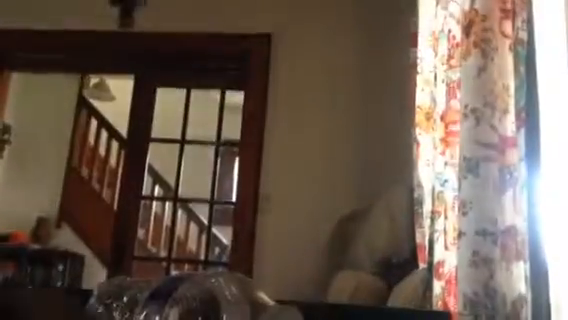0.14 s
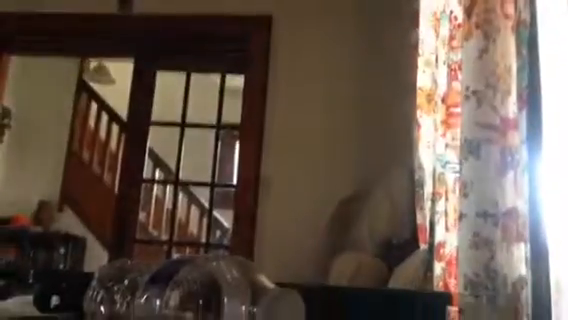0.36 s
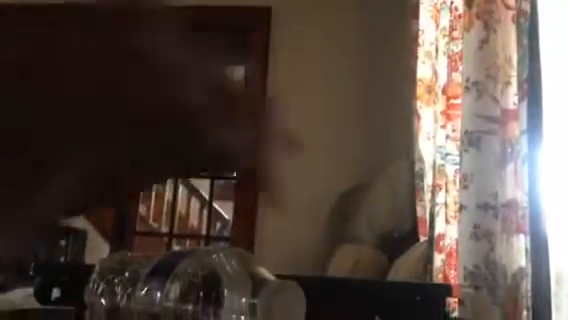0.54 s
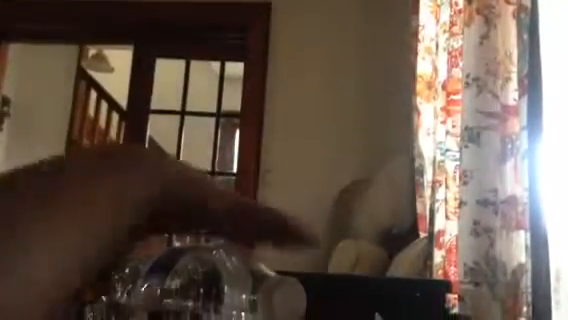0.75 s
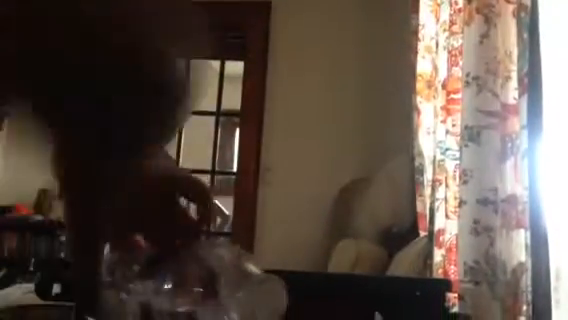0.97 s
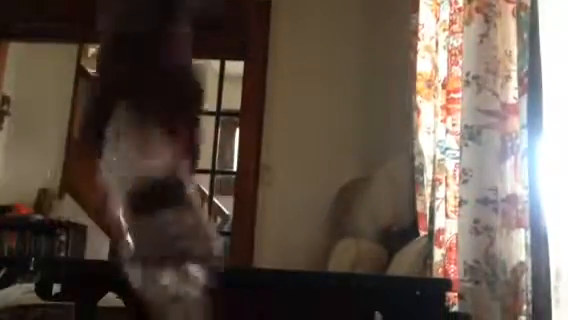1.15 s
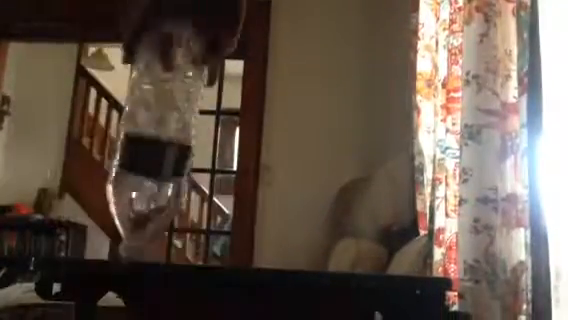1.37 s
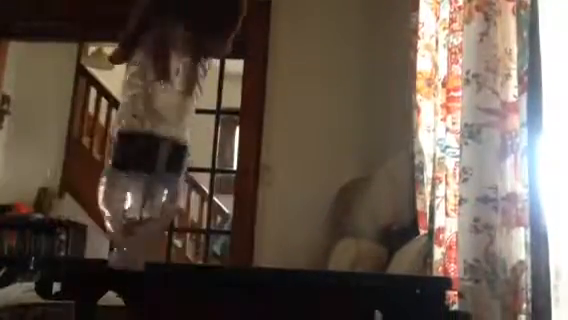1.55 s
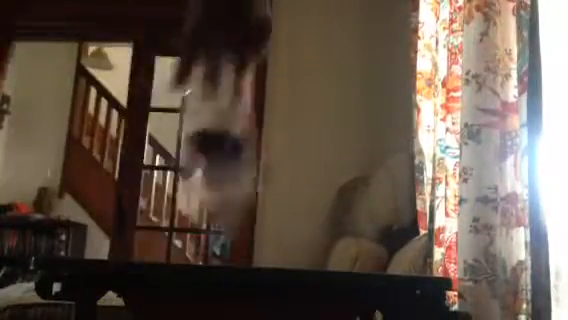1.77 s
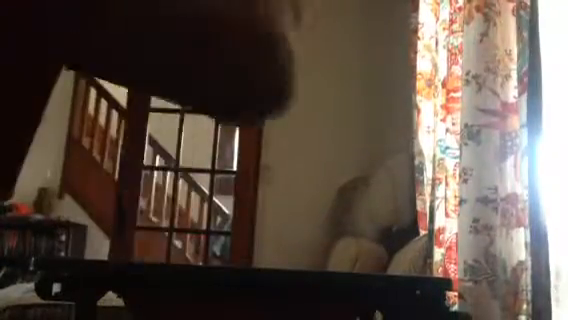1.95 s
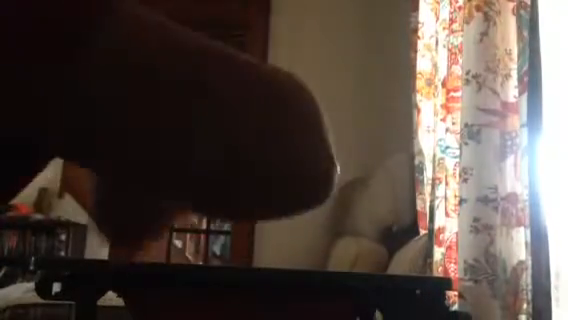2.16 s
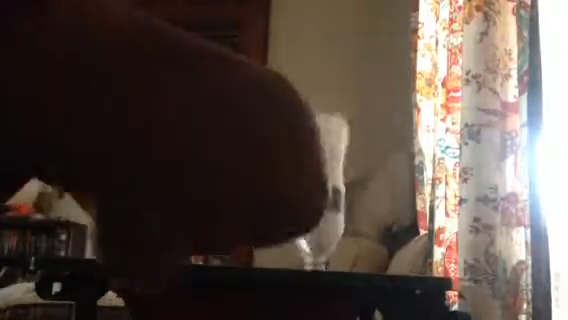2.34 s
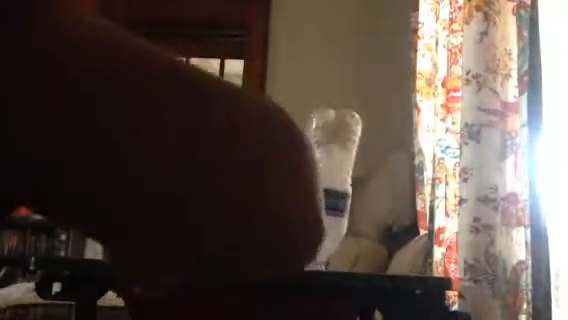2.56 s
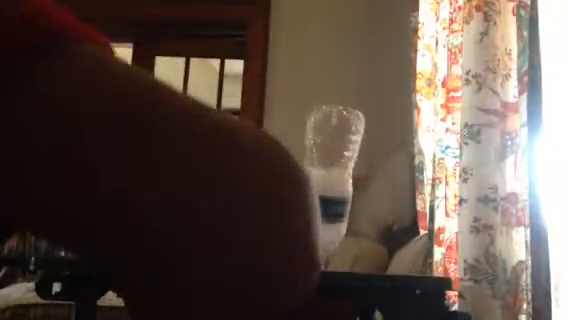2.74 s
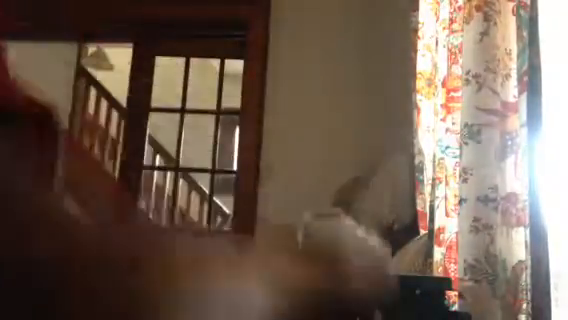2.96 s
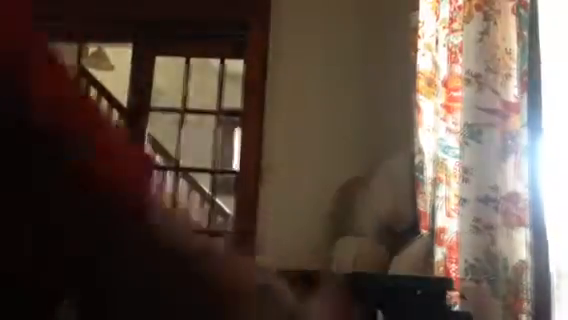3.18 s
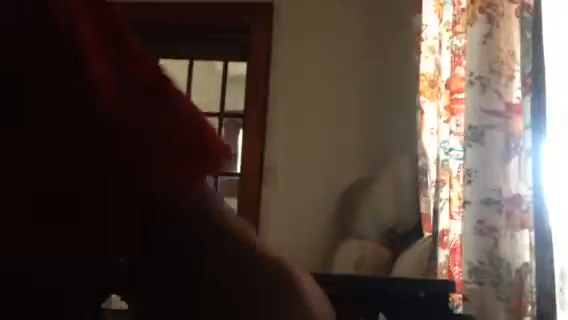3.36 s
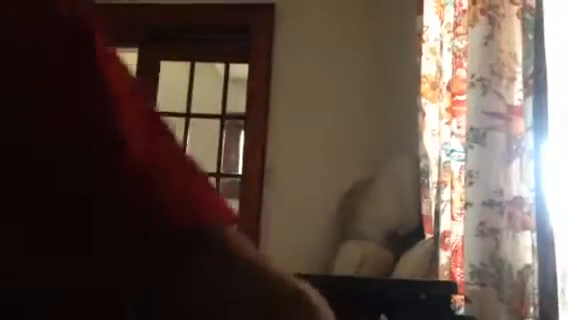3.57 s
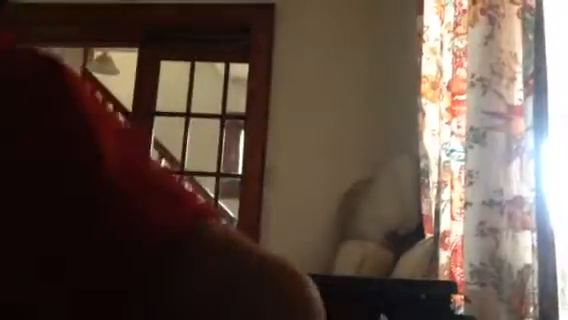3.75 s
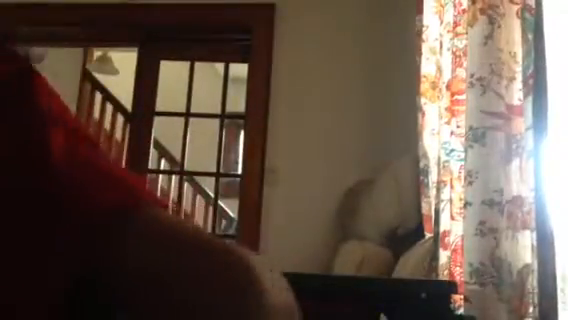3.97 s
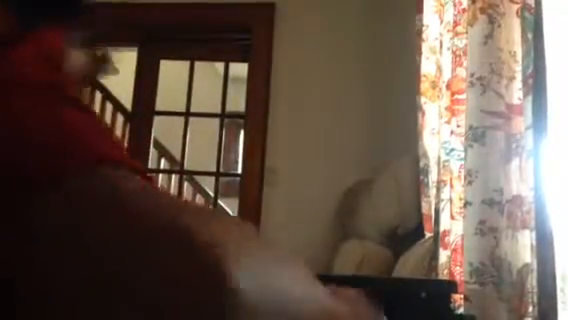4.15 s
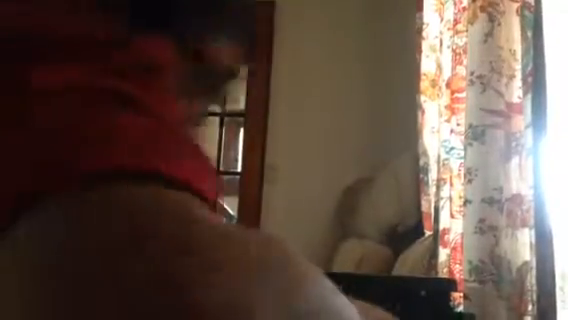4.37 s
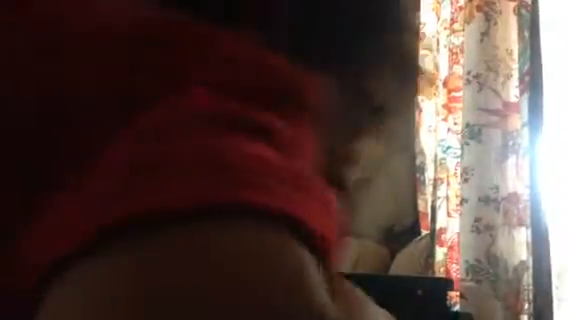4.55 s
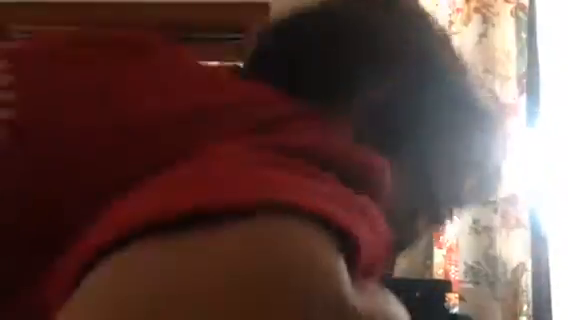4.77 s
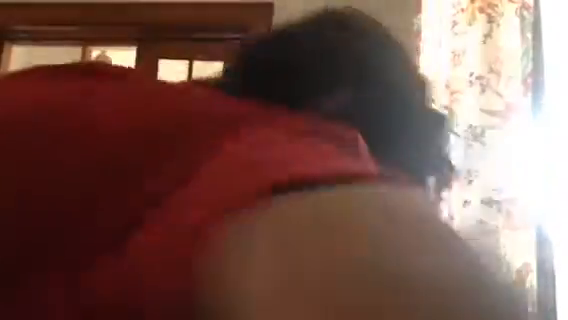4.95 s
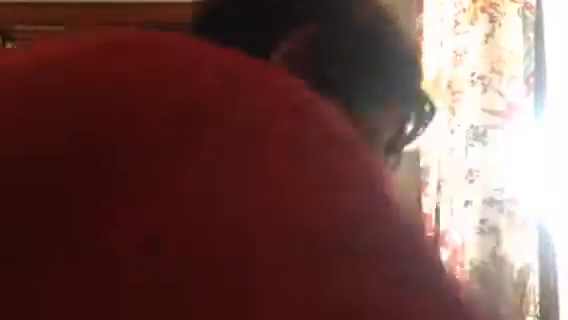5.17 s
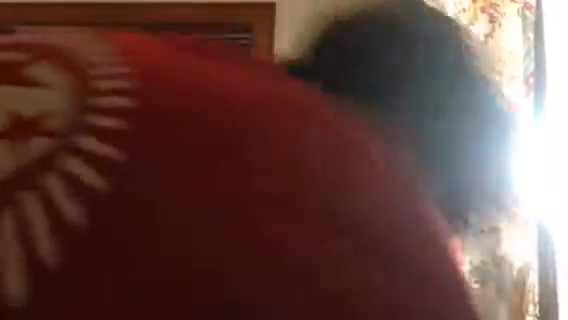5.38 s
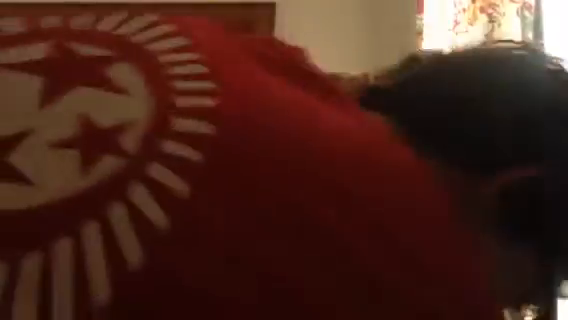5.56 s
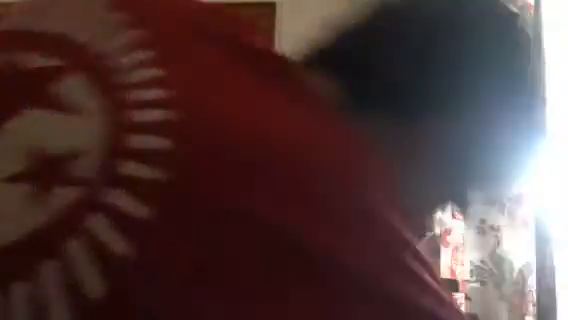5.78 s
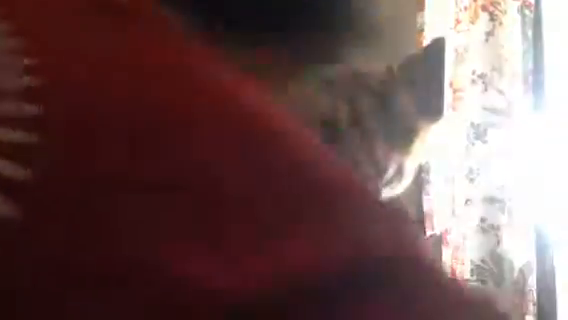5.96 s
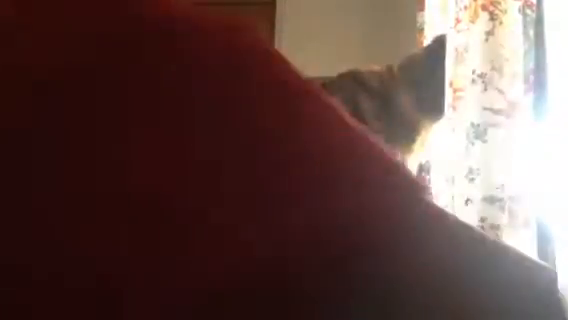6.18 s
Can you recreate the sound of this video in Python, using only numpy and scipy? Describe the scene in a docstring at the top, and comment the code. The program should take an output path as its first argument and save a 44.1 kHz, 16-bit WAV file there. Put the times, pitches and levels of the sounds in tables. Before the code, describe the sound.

Close to the microphone in a furnished living room, a part-filled plastic bottle pops and crackles as fingers grip it. After a brief gap it lands on a table with a loud cracking thunk, water shuddering, wood and metal ringing briefly. Dull knocks follow, including a heavy thump a second later, then soft arm and cloth rubbing, and a last burst of plastic snaps.

```python
"""Bottle flip and landing

A part-filled plastic bottle is flipped and lands upright on a table with a loud thunk; table and metal ring.
Its wall snaps under the fingers, then it is grabbed, knocked on the table and handled in a living room.
Blows and snaps are short noisy pushes through panel filters; rings are decaying sines; fingers, arm and
sleeve are trains of tiny slips. Noise tails make the room; gain control ducks after loud sounds."""
import sys
import numpy as np
from scipy import signal
from scipy.fft import rfft, irfft
from scipy.io import wavfile
from scipy.ndimage import uniform_filter1d

SR = 44100
rng = np.random.default_rng(int(sys.argv[2]) if len(sys.argv) > 2 else 0)


def wav_record(signal):
    """Record a signal, one row per channel, as 16-bit PCM in the file named by sys.argv[1]."""
    frames = np.transpose(np.atleast_2d(signal))
    bounded = np.clip(frames, -1, 1)
    # unit amplitude maps onto the largest positive 16-bit level
    quanta = np.round(bounded * 32767).astype(np.int16)
    wavfile.write(sys.argv[1], SR, quanta)


N = 274302
TIME = np.arange(N) / SR
BINS = np.fft.rfftfreq(8192, 1 / SR) + 1  # filter grid in Hz, offset by 1 to avoid zero

# table-top modes: f/Hz, relative level/dB, t60/s
TABLE_MODES = [(109, -15.5, 0.31), (187.7, -6.5, 0.54), (239, -6, 0.14), (297.6, -4, 0.41),
               (336, -0.5, 0.18), (384.7, -1, 0.09), (414.8, 0.5, 0.15), (534, -13.5, 0.27),
               (612, -9.5, 0.2), (754, -12, 0.18), (764, -4.5, 0.12), (845, -8, 0.12), (1001, -12, 0.096),
               (1174, -11.5, 0.2), (1219, -13, 0.17)]


def gain_of(db):
    """Amplitude gain of a level in dB."""
    return 10 ** (np.asarray(db) / 20)


def unit(x):
    """Scales to energy 1."""
    return x / np.sqrt(np.sum(x ** 2) + 1e-20)


def read(points, hz):
    """Reads a table on a log-frequency axis."""
    f, value = np.transpose(points)
    return np.interp(np.log(hz + 1), np.log(f + 1), value)


def add(mix, s, sound):
    """Mixes a sound in at time s."""
    part = mix[round(s * SR):][:len(sound)]
    part += sound[:len(part)]


def colour(x, curve_db):
    """Causal minimum-phase filter with the given gain on BINS, so attacks stay sharp."""
    floored_db = np.maximum(curve_db, curve_db.max() - 90)
    log_gain = np.log(gain_of(floored_db))
    whole = np.r_[log_gain, log_gain[-2:0:-1]]
    spectrum = np.exp(np.conj(signal.hilbert(whole)))
    taps = np.fft.ifft(spectrum).real
    return signal.fftconvolve(x, taps[:len(BINS) // 2])


def dying_noise(t60s, hold_s=0, hold_hz=900):
    """One second of dense vibration, each band dying at its own speed; the lows stay driven for hold_s."""
    hz, t, z = signal.stft(rng.standard_normal(SR), SR, nperseg=256)
    band_hold_s = hold_s / (1 + (hz[:, None] / hold_hz) ** 2)
    free_s = np.maximum(t - band_hold_s, 0)
    decay = gain_of(-60 * free_s / read(t60s, hz)[:, None])
    return signal.istft(z * decay, SR, nperseg=256)[1][:SR]


def ring(modes, hold_s=0):
    """Modes pushed off together, driven for hold_s, then ringing freely; energy 1."""
    t = TIME[:SR]
    free_s = np.maximum(t - hold_s, 0)
    total = np.zeros(SR)
    for hz, db, t60_s in modes:
        total += gain_of(db - 60 * free_s / t60_s) * np.sin(2 * np.pi * hz * t)
    return unit(total)


def strike(push, pitch_hz, tilt_db, bite_db, q, thud=0, bite_hz=3500, top_hz=12000):
    """A push through a panel resonance: some thud below, a slope above, thin-plastic bite, top damping."""
    r = BINS / pitch_hz
    panel_db = 20 * np.log10(abs(r * np.hypot(r, thud) / (1 - r * r + 1j * r / q)))
    slope_db = tilt_db * np.log2(np.maximum(r, 1))
    damping_db = -10 * np.log10(1 + (BINS / top_hz) ** 4)
    bite_curve_db = bite_db * np.exp(-np.log2(BINS / bite_hz) ** 2)
    return unit(colour(push, panel_db + slope_db + damping_db + bite_curve_db))


def chatter(t60_s, share):
    """A sharp push followed by irregular shaking that dies away."""
    t = TIME[:SR // 4]
    push = share * unit(rng.standard_normal(len(t)) * gain_of(-60 * t / t60_s))
    push[0] += 1
    return push


def scuff(contact_s, share, cushion_s=0.0003):
    """A cushioned push, with scraping that swells over the contact time and dies away."""
    t = TIME[:SR // 4]
    u = t / contact_s
    push = np.exp(-t / cushion_s)
    scrape = unit(rng.standard_normal(len(t)) * u * np.exp(-u))
    return push / push.sum() + share * scrape


def lumps(rate_hz, depth_db):
    """One second of uneven gain: random levels at rate_hz, joined by straight lines in dB."""
    steps = rng.standard_normal(SR)
    return gain_of(depth_db * np.interp(TIME[:SR] * rate_hz, np.arange(SR), steps))


def landing(crack_db=10, shudder_db=16, table_db=12, metal_db=1.5, rim_db=-4, room_db=-15,
            crack_s=0.00069, give_s=0.0011, water_s=0.046, rim_rise_s=0.006):
    """Rim touches and flexes, base cracks down, falling water keeps driving the table, metal rings on."""
    # metal shaken along with the table: f/Hz, relative level/dB, t60/s
    metal_modes = [(845, -13, .85), (1507, -8, .85), (1556, -16, 1.1), (1771, -14, 1.1), (1868, -12, .92),
                   (1883, -1, .4), (1983, 0, .38), (2196, -18, 1.2), (2282, -6, .98), (2359, 1, .44)]
    # crack of the base: f/Hz, relative level/dB
    crack_tone = [(100, 2), (330, 8.5), (2900, -8.5), (5000, -2), (7500, 1.5), (10500, -11.5), (15000, -8)]
    # shudder of bottle and water: f/Hz, relative level/dB
    shudder_tone = [(25, -15.5), (70, -2), (120, -9), (220, -2), (400, 2.5), (520, -8.5), (800, -2.5),
                    (1300, -15), (2100, -14), (2900, -14.5), (4000, -16), (6000, -19.5), (10000, -22),
                    (15000, -23.5)]
    # shudder decay: f/Hz, t60/s
    shudder_t60 = [(100, 0.26), (400, 0.2), (900, 0.18), (2200, 0.37), (5000, 0.28), (10000, 0.23)]
    landing_s = 2.4652
    t, out = TIME[:SR], np.zeros(N)
    brief = t[:SR // 40]
    rim_push = rng.standard_normal(len(brief)) * np.exp(brief / rim_rise_s)
    rim = strike(rim_push, 256, -10.5, 0, q=0.39)
    u = brief / crack_s
    crack = colour(rng.standard_normal(len(u)) * u * np.exp(-u), read(crack_tone, BINS))
    load = 1 - np.exp(-t / give_s)  # the base gives way before the full weight arrives
    clatter = lumps(rate_hz=170, depth_db=2.8)
    shaking = dying_noise(shudder_t60, water_s) * load * clatter
    shudder = colour(shaking, read(shudder_tone, BINS))
    add(out, landing_s - brief[-1], gain_of(rim_db) * rim)  # the rim push swells up to the landing
    add(out, landing_s, gain_of(crack_db) * unit(crack))
    add(out, landing_s, gain_of(shudder_db) * unit(shudder))
    add(out, landing_s, gain_of(table_db) * ring(TABLE_MODES, water_s / 2) * load)
    add(out, landing_s, gain_of(metal_db) * ring(metal_modes) * load)
    return np.array([out, gain_of(room_db) * out])


def snaps(echo_s=0.001191, echo=0.33, shake_t60_s=0.013):
    """The wall buckles; each snap returns once from the bottle's far end. Gives direct sound, room feed."""
    # wall snaps: t/s, energy/dB, panel pitch f/Hz, tilt/(dB/octave), bite/dB, room feed/dB re direct
    snap_rows = [(1.114, -1, 665, -4.5, 27, -26), (1.1161, -3, 680, -6, 10, -25.5),
                 (1.121, -5.5, 670, -20, 24, -15), (1.1748, -16.5, 4770, -9.5, 2, -19),
                 (1.263, -29, 5600, -16, -10, -27), (1.3656, -24, 744, -2.5, 7, -16.5),
                 (1.4614, -22.5, 2620, -11, -9, -21), (1.5356, -7, 650, -6, 10.5, -15.5),
                 (1.603, -16, 730, -20, 16, -17), (1.628, -3.5, 905, 0.5, 6, -24),
                 (1.704, -3, 1030, -3, 7.5, -24), (1.7781, -7.5, 686, -2.5, 5.5, -12.5),
                 (1.7997, -1.5, 1700, -5, 4.5, -28), (1.8132, -25, 1900, 0, -6, -8),
                 (1.8694, -6, 2140, -7.5, -1, -25.5), (1.9228, -10.5, 1030, -14.5, 16, -20),
                 (2, -17.5, 696, -5.5, 18, -13), (2.017, -15.5, 540, -8, 18, -4.5),
                 (2.021, -13, 700, -4.5, 18, -19), (2.0403, -20, 730, -15, 22, -9),
                 (2.0477, -8.5, 770, -18.5, 6, -9), (2.0887, -3.5, 660, -5, 2, -19.5),
                 (2.0977, -10, 640, -9.5, 1, -15.5), (2.108, -21.5, 2014, -2.5, -7, -3.5),
                 (2.169, -20, 1210, -7.5, 6.5, -11.5), (3.0357, -22.5, 750, -3, 12, -14),
                 (3.2496, -7.5, 450, -7.5, 9, -19.5), (3.2798, -14.5, 590, -2, 7, -23.5),
                 (3.288, -6, 385, -3, 6, -16.5), (3.3605, -26, 420, -5, -4, -31),
                 (3.663, -23, 2620, -28, -3.5, -14), (5.824, -31.5, 2660, -23, 0, -15),
                 (5.8593, -18.5, 614, -9, 27, -17), (5.871, -22.5, 1400, -20, 16, -16),
                 (5.8915, -10.5, 362, -1.5, 12, -22), (5.903, -25, 600, -3, 8, -20),
                 (6.007, -25.5, 920, -4.5, 12, -13.5), (6.065, -30, 2800, -13, 4, -17),
                 (6.101, -15.5, 2900, -9.5, 1, -8), (6.11, -13, 500, -8.5, 24, -22),
                 (6.122, -21.5, 704, -13.5, 16, -8), (6.1351, -3.5, 590, -5.5, 14, -20.5),
                 (6.1467, -10, 950, -7.5, 23.5, -19), (6.2124, -18.5, 560, -3.5, 17, -17)]
    near, far = np.zeros((2, N))
    for s, db, pitch_hz, tilt_db, bite_db, room_db in snap_rows:
        push = chatter(shake_t60_s, share=1.5)
        delay = round(echo_s * SR * rng.uniform(.86, 1.12))
        push = push + echo * np.roll(push, delay)
        sound = gain_of(db) * strike(push, pitch_hz, tilt_db, bite_db, q=1.25, thud=0.7)
        add(near, s, sound)
        add(far, s, gain_of(room_db) * sound)
    return np.array([near, far])


def knocks(table_db=-12, bite_db=6):
    """Bottle, hand and arm hit the table: dull blows that stir its modes. Gives direct sound, room feed."""
    # blows: t/s, energy/dB, pitch f/Hz, tilt/(dB/octave), contact/s
    blow_rows = [(1.1168, -18, 150, -8.5, 0.0024), (1.207, -27, 180, -16.5, 0.0044),
                 (2.031, -15.5, 232, -7.5, 0.007), (2.089, -11.5, 251, -5.5, 0.0038),
                 (2.54, -9, 150, -12.5, 0.0015), (2.563, -5, 490, -12.5, 0.0022),
                 (2.638, -12, 100, -8, 0.0071), (2.977, -19, 517, -22, 0.033),
                 (3.004, -11.5, 140, -7, .005), (3.031, -12.5, 550, -19.5, 0.0064),
                 (3.104, -10, 128, -7, 0.0025), (3.154, -20.5, 131, -8, 0.0022),
                 (3.236, -5.5, 223, -9, 0.0042), (3.288, -6, 131, -6, 0.0092),
                 (3.433, 5.5, 54.4, -16, 0.0034), (3.438, 7, 213, -10, 0.004),
                 (3.4395, -4, 565, -9.5, 0.0036), (3.451, -9, 700, -11.5, 0.007),
                 (3.471, -6.5, 58.6, -10.5, 0.0075), (3.525, -13, 306, -12.5, 0.0019),
                 (3.66, -12, 187, -10.5, 0.0091), (3.676, -12, 256, -14.5, 0.0079),
                 (3.715, -19, 215, -20, 0.0083), (4.197, -17.5, 125, -19, 0.0047),
                 (4.355, -28, 444, -17.5, 0.0047), (4.375, -18, 110, -15.5, 0.015),
                 (4.75, -18, 71, -21, .008), (5.514, -20.5, 175, -12, 0.0049),
                 (5.712, -24.5, 320, -18, 0.015), (5.784, -6, 290, -17.5, 0.0028),
                 (5.892, -11.5, 264, -10, 0.0024)]
    room_db, room_per_db = -15, -0.46  # feed of a 0 dB blow; softer blows are more diffuse
    rattle, rattle_per_db = 2, -0.4  # scrape share of a 0 dB blow; softer blows scuff more
    near, far = np.zeros((2, N))
    table = ring(TABLE_MODES) * (1 - np.exp(-TIME[:SR] / 0.00061))
    for s, db, pitch_hz, tilt_db, contact_s in blow_rows:
        push = scuff(contact_s, share=rattle * gain_of(rattle_per_db * db))
        sound = gain_of(db) * strike(push, pitch_hz, tilt_db, bite_db, q=0.37)
        add(near, s, sound)
        add(near, s, gain_of(db + table_db) * table)
        add(far, s, gain_of(room_db + room_per_db * db) * sound)
    return np.array([near, far])


def crinkles(tilt_db=-6, t60_s=0.053, room_db=-11):
    """Small panels of the gripped wall give way unevenly, each at its own pitch. Direct sound, room feed."""
    # faint crinkling: start t/s, length/s, count, middle energy of a crinkle/dB
    crinkle_rows = [(1.18, 0.35, 7, -33), (1.782, 0.02, 4, -25), (1.821, 0.046, 3, -26.5)]
    middle_hz, scatter_octaves, scatter_db = 2560, 1.4, 2  # scatter is per unit of the draws below
    near = np.zeros(N)
    for start_s, length_s, count, db in crinkle_rows:
        draws = rng.uniform(-0.6, 1, (round(count), 3))
        for k, (late, pitch, strength) in enumerate(draws):
            pitch_hz = middle_hz * 2 ** (scatter_octaves * pitch)
            sound = strike(chatter(t60_s, share=10.0), pitch_hz, tilt_db, 0, q=2.7)
            s = start_s + length_s * (k + .5 + late / 2) / count
            add(near, s, gain_of(db + scatter_db * strength) * sound)
    return np.array([near, gain_of(room_db) * near])


def rubbing(tone, slips_per_s, spread_db):
    """Friction: many tiny slips of uneven size, rms 1."""
    slips = (rng.random(N) < slips_per_s / SR) * rng.standard_normal(N)
    slips *= gain_of(spread_db * np.minimum(rng.exponential(1, N), 4))
    return unit(colour(slips, read(tone, BINS))[:N]) * np.sqrt(N)


def strokes(rows, rise_db_per_s, fall_db_per_s):
    """Gain of a series of movements: each swells up to its start, holds for its length and fades."""
    levels = []
    for start_s, length_s, db in rows:
        rise_db = rise_db_per_s * np.maximum(start_s - TIME, 0)
        fall_db = fall_db_per_s * np.maximum(TIME - start_s - length_s, 0)
        levels.append(db - rise_db - fall_db)
    return gain_of(np.max(levels, axis=0))


def fingers():
    """Fingers sliding on the plastic and water shifting inside, as coloured slips."""
    # movements: start t/s, length/s, level/dB rms
    moves = [(1.04, 0.95, -62), (2.04, 0.094, -52), (3.02, 0.078, -67), (3.3, 0.02, -50.5),
             (5.8, 0.34, -67.5), (6.13, 0.035, -53)]
    # colour: f/Hz, relative level/dB
    tone = [(100, 2), (600, -2), (1300, -9.5), (2200, -10), (2900, -11), (4200, -10.5), (8000, -15.5),
            (15000, -28)]
    slips = rubbing(tone, slips_per_s=2300, spread_db=2.5)
    return slips * strokes(moves, rise_db_per_s=291, fall_db_per_s=260)


def arm():
    """An arm and body shifting against the table, as sparser, low-pitched slips."""
    # movements: start t/s, length/s, level/dB rms
    moves = [(.85, 0.53, -65.5), (3.04, 0.017, -43.5), (3.27, 0.23, -50.5), (4.03, 0.5, -60.5),
             (4.75, 0.88, -62.5), (5.9, 0.11, -62)]
    # colour: f/Hz, relative level/dB
    tone = [(25, -6.5), (70, 4.5), (160, -2), (350, -6.5), (800, -21), (2500, -42.5)]
    slips = rubbing(tone, slips_per_s=840, spread_db=0.5)
    return slips * strokes(moves, rise_db_per_s=169.5, fall_db_per_s=85)


def sleeve():
    """A shirt sleeve sweeping past the microphone, as dense slips of cloth."""
    # sweeps: start t/s, length/s, level/dB rms
    moves = [(4.41, 0.037, -65), (5.07, 0.059, -59), (5.535, 0.026, -62.5)]
    # colour: f/Hz, relative level/dB
    tone = [(200, -15), (900, 3.5), (1500, -1), (3000, -6.5), (6000, -10.5), (15000, -19.5)]
    slips = rubbing(tone, slips_per_s=9000, spread_db=1.0)
    return slips * strokes(moves, rise_db_per_s=148, fall_db_per_s=148)


def room(x, build_s=0.0052, count=9):
    """Furnished room: quick build-up, lost treble; several random tails, taken in rotation."""
    # decay: f/Hz, t60/s
    tail_t60 = [(100, .22), (600, .25), (2200, .24), (5000, .18), (12000, .09)]
    # colour: f/Hz, level/dB
    tone = [(60, 0.5), (500, 1.5), (2500, 6.5), (5000, 5), (9000, 5.5), (15000, -5.5)]
    out = np.zeros(N)
    turn = (TIME // .07) % count  # the next tail every 0.07 s
    build = 1 - np.exp(-(TIME[:SR] / build_s) ** 2)
    for k in range(count):
        tail = unit(dying_noise(tail_t60) * build)
        out += signal.fftconvolve(x * (turn == k), tail)[:N]
    return colour(out, read(tone, BINS))[:N]


def background():
    """Steady room noise and microphone hiss as shaped noise, with a faint mains hum of sines."""
    # room noise and hiss: f/Hz, relative level/dB
    air_tone = [(20, -14), (60, 3), (90, -2), (250, -4), (360, -9), (480, -7), (700, -13), (1000, -18),
                (2000, -19), (4500, -20), (7000, -23), (15000, -24)]
    # hum: f/Hz, level/dB rms
    hum_lines = [(59.2, -67), (469, -75)]
    air_gain = gain_of(read(air_tone, np.fft.rfftfreq(N, 1 / SR)))
    air = irfft(rfft(rng.standard_normal(N)) * air_gain, N)
    hum = np.zeros(N)
    for hz, db in hum_lines:
        hum += gain_of(db) * np.sqrt(2) * np.sin(2 * np.pi * (hz * TIME + rng.random()))
    return gain_of(-63) * unit(air) * np.sqrt(N) + hum  # air at -63 dB rms


def microphone(x, notch_hz=2820, width_hz=280, notch_db=-4, low_hz=40):
    """The sound port in the casing weakens a narrow band, and the deepest bass is lost."""
    notch = notch_db * np.exp(-((BINS - notch_hz) / width_hz) ** 2)
    bass = -10 * np.log10(1 + (low_hz / BINS) ** 4)
    return colour(x, notch + bass)[:N]


def scene():
    """Landing, snaps, knocks and crinkles in the room, over handling noises and background."""
    near, far = landing() + snaps() + knocks() + crinkles()
    handling = fingers() + arm() + sleeve()
    return (near + room(far) + handling + background())[None]


def record(dry, threshold_db=-19, recover_s=0.78, attack_s=0.036, edge_hz=15450):
    """Microphone colour; gain control that ducks after loud sounds and recovers slowly; band limit."""
    sound = microphone(dry[0])
    power_db = 10 * np.log10(abs(uniform_filter1d(sound ** 2, size=441)) + 1e-12)  # 10 ms mean
    excess_db = np.maximum(power_db - threshold_db, 0)
    fade = np.exp(-TIME / recover_s)
    held_db = np.maximum.accumulate(excess_db / fade) * fade  # peak hold, decaying over recover_s
    r = np.exp(-1 / (attack_s * SR))
    duck_db = signal.lfilter([1 - r], [1, -r], held_db)
    ducked = sound / gain_of(duck_db)
    low_pass = signal.firwin(255, edge_hz, window=("kaiser", 8), fs=SR)
    return signal.oaconvolve(ducked, low_pass, "same")[None]


dry = scene()
out = record(dry)
wav_record(out)
```